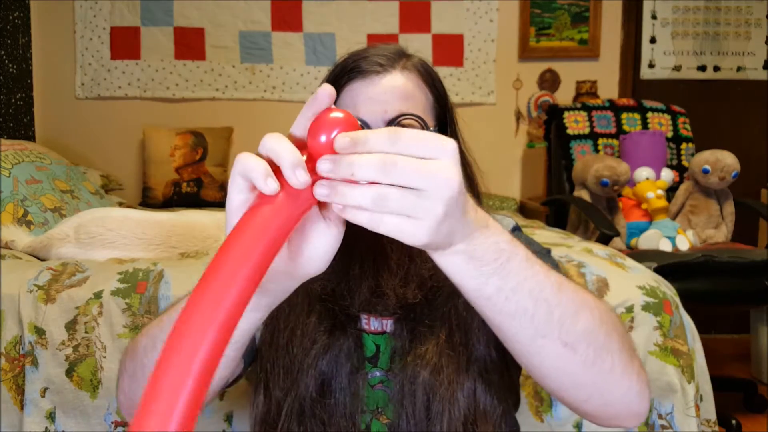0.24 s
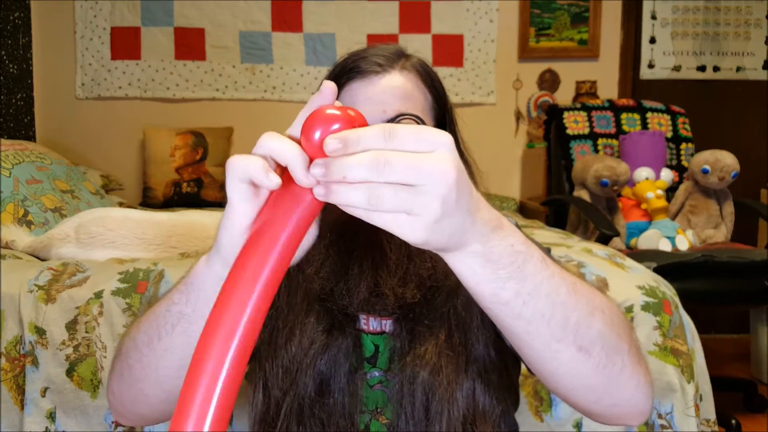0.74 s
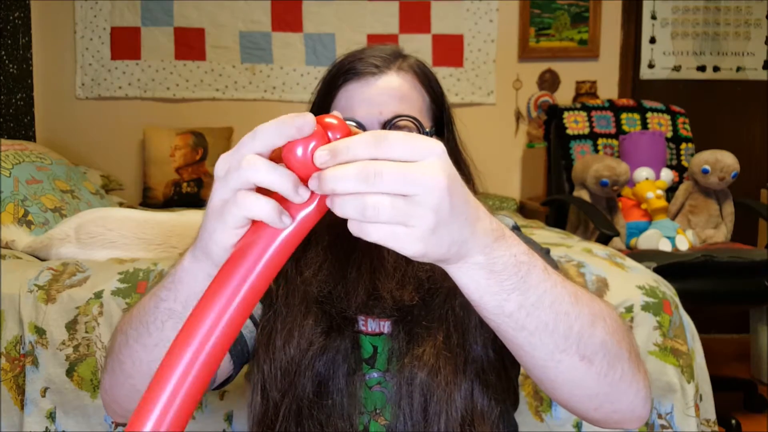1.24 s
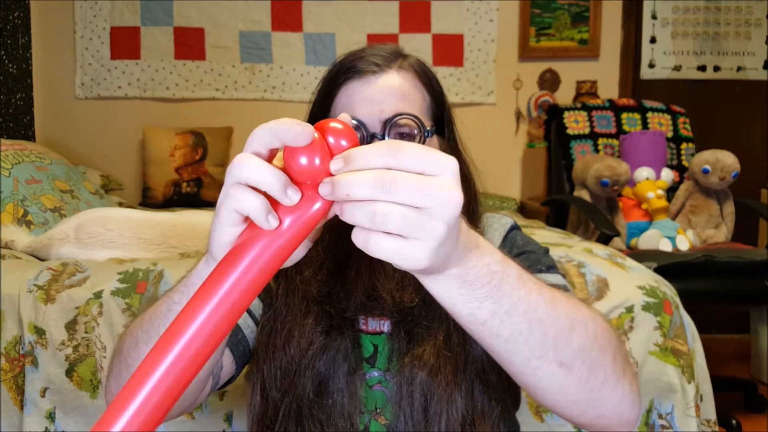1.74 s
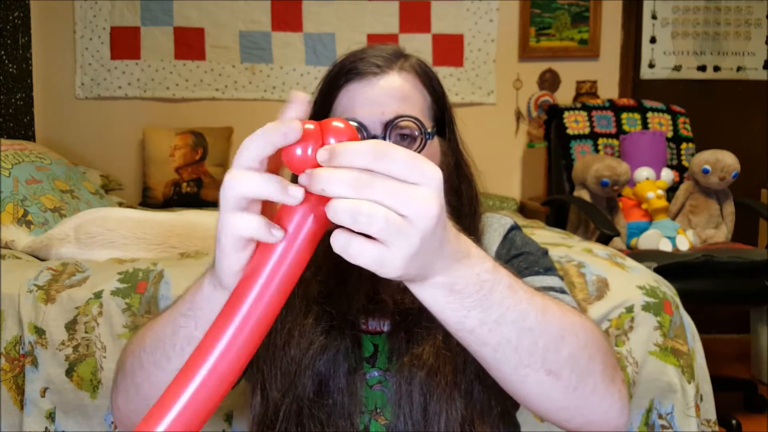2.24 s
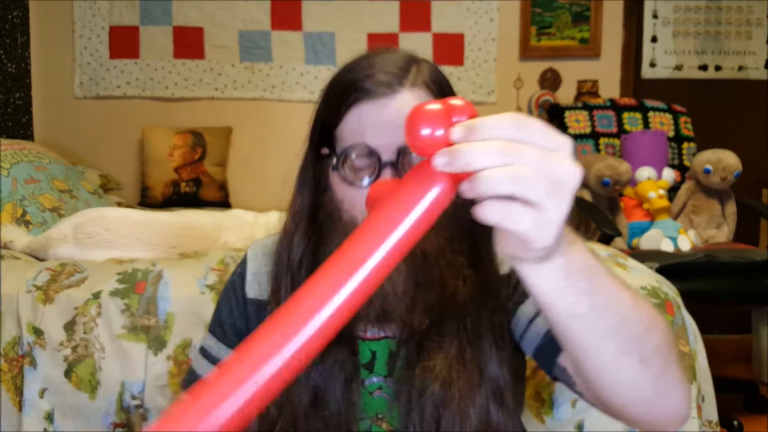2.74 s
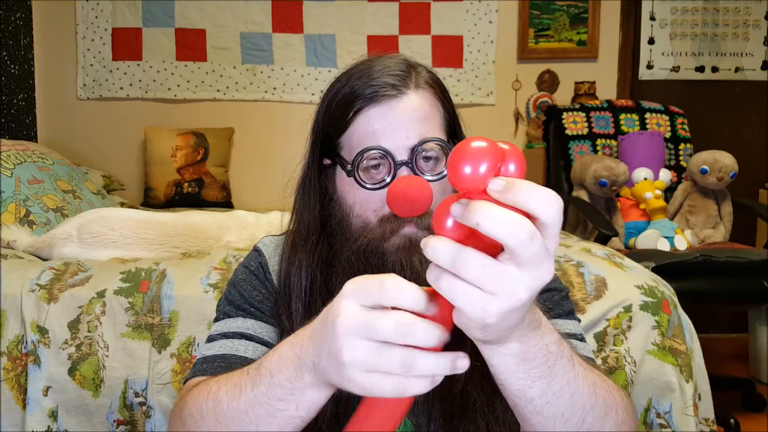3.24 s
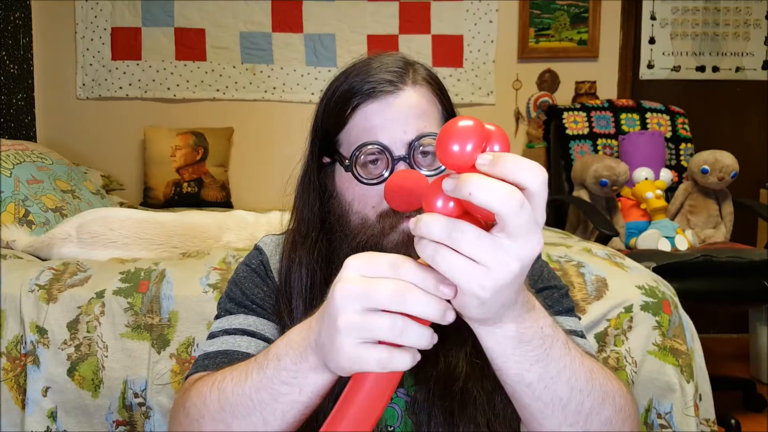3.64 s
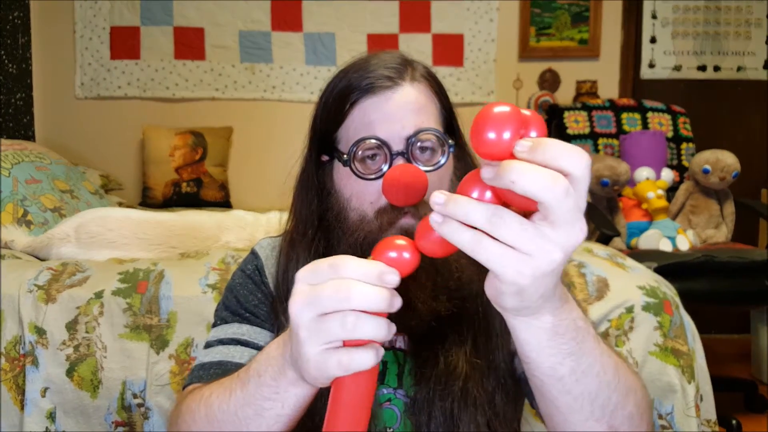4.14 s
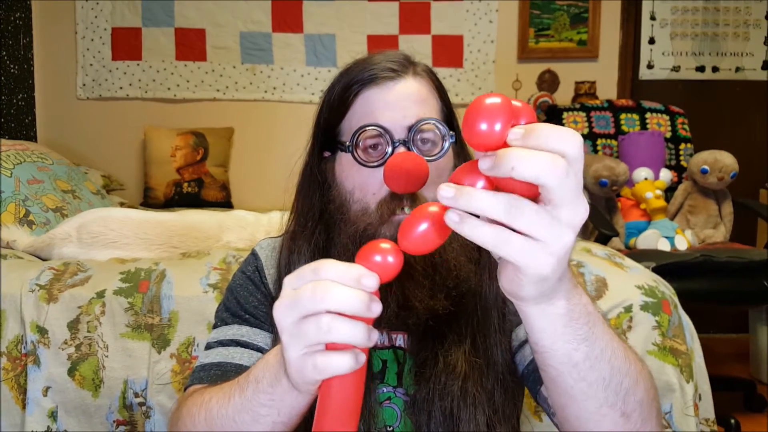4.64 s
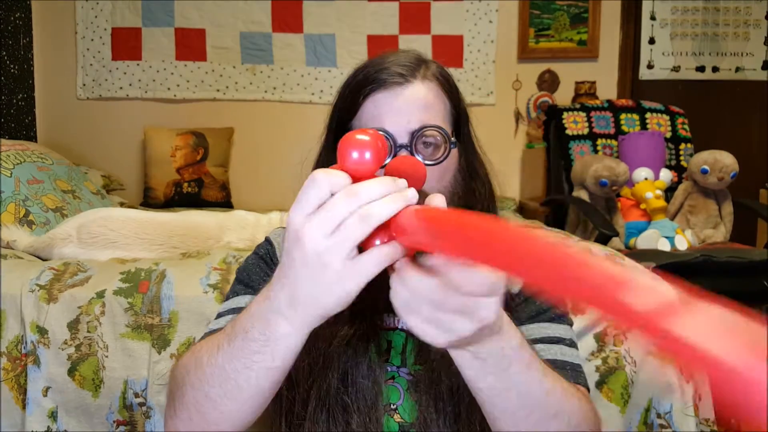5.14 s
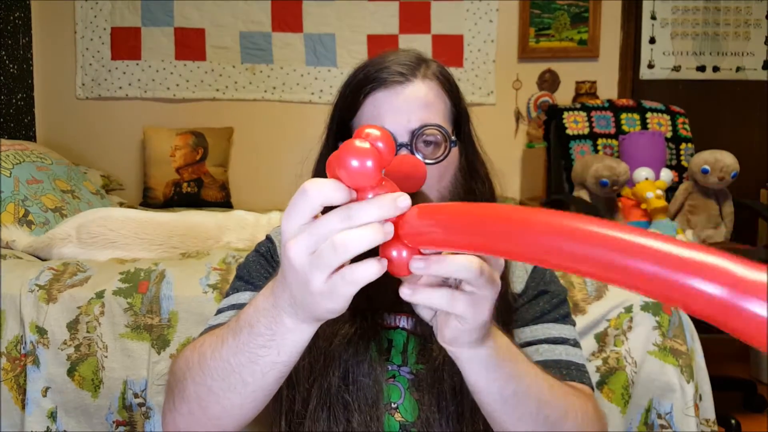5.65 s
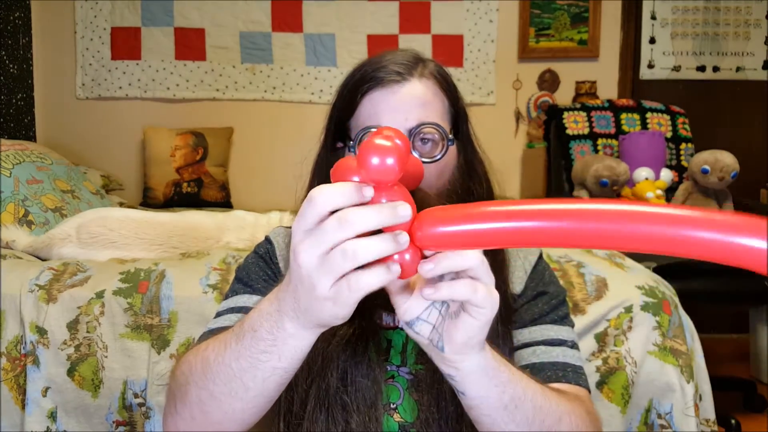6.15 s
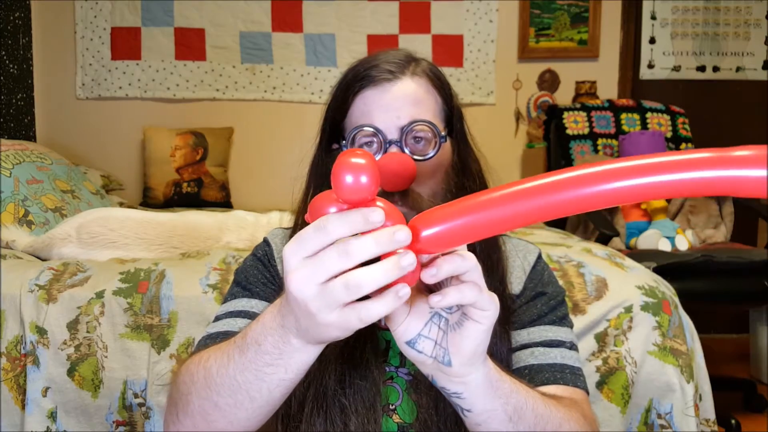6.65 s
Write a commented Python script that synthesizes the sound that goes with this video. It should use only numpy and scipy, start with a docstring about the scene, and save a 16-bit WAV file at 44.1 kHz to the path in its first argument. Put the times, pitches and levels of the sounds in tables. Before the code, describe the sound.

Close rubbery creaks and dry crackly scrapes come in uneven bursts, with hollow pops and popping clicks as a balloon is twisted indoors.

```python
"""In a small, soft bedroom, hands twist a long latex balloon close to two microphones.
Stick-slip friction on rubber and skin makes each stroke a creaking run of tiny slips, now and then a squeak;
single big slips make hollow clicks. Every slip rings the taut skin, thumps the air in the pinched bubble
and sheds a bright crackle of noise. Enclosed air rings in sympathy, over a short reverberation and still air."""
import sys
import numpy as np
from scipy import signal
from scipy.fft import rfft, irfft
from scipy.io import wavfile
from scipy.ndimage import uniform_filter1d, map_coordinates

SR = 44100
rng = np.random.default_rng(int(sys.argv[2]) if len(sys.argv) > 2 else 0)


def to_wav(s):
    """Save 16-bit WAV."""
    ch = np.atleast_2d(s).T  # columns
    pcm = np.round(np.clip(ch, -1, 1) * 32767)  # PCM
    wavfile.write(sys.argv[1], SR, pcm.astype(np.int16))


N = 303408
TIME = np.arange(N) / SR   # s

# Source levels in the tables are nominal: trims, air resonance and filters come later.
# still air, spectral shape only: frequency_hz, relative_density_db
AIR_SPECTRUM = [(25, -5), (130, 6.5), (400, -1.5), (3000, -25.5), (16000, -23)]
AIR_RMS_DB = -73
# colour of the reverberation: frequency_hz, relative_db
ROOM_SPECTRUM = [(150, -5), (800, -1)]
ROOM_T60_S = 0.23
# likeness of diffuse sound in the two channels: frequency_hz, correlation (no unit)
CHANNEL_LIKENESS = [(40, 0.52), (220, 0.83), (700, 0.69), (4000, 0.43)]
# position of the balloon, left of the middle and then near it: time_s, left_right_balance_db, left_lead_ms
POSITION = [(2.4, 0.86, 0.095), (2.85, -0.2, -0.026)]
# air modes of the long tube: frequency_hz, gain_db
TUBE_MODES = [(497, -9), (635, -8), (806, -10), (935, -9), (1636, -9)]
# air modes of a small twisted-off bubble: frequency_hz, gain_db
FREE_BUBBLE_MODES = [(727, 6), (1416, -2), (2191, -1)]
FREE_START_S, FREE_END_S = 4.7, 4.95   # the bubble hangs free between the hands
AIR_T60_S = 0.22
# lowest resonance of the bubble in the fingers: time_s, resonance_hz
BUBBLE_RESONANCE = [(0, 450), (2.1, 422.5), (2.3, 291.1), (3.7, 426.3), (4.25, 365.8), (4.4, 200.6),
                    (4.6, 194), (4.75, 290), (4.97, 280), (5.45, 379), (6.74, 429.9)]
# colour of the skin's modes over all grips: frequency_hz, gain_db
SKIN_COLOUR = [(500, -5), (820, 4.5), (1200, -3), (1650, 0.5), (2700, 1.5), (3500, -2), (4500, 4.5)]
# colour of the crackle: frequency_hz, relative_density_db
CRACKLE_SPECTRUM = [(1000, -3.5), (2500, 7), (4000, 1.5), (5500, -2.5), (10500, -5), (16000, -13)]
# squeaks, slips locked to one skin mode: start_s, length_s, level_db, pitch_hz, glide_octaves
SQUEAK_EVENTS = [(0.045, 0.062, -48.5, 929, -0.12), (1.373, 0.032, -52, 2040, .15),
                 (1.652, .016, -46.5, 3150, -.05), (3.032, 0.031, -57.5, 531, .5),
                 (3.055, 0.043, -54, 1443, 0), (5.38, 0.0063, -48.5, 894.4, -0.017),
                 (6.417, 0.03795, -68.5, 3117, .1), (6.523, 0.008, -45, 2620, 0)]
# single big slips, levels over the first 5 ms: start_s, ring_db, ring_hz, crack_db, thump_db
BIG_SLIPS = [(0.7132, -44, 1592, -53.5, -63.5), (0.8195, -50, 1700, -45, -53), (0.839, -37, 1065, -47, -64),
             (0.9319, -40, 1710, -61, -44.5), (1.1002, -40.5, 1538, -47.5, -42),
             (1.6505, -37, 2500, -44.5, -66), (1.7542, -40, 1099, -39, -45),
             (1.8084, -21, 830, -33.5, -36.5), (1.8243, -26, 838, -38.5, -33.5),
             (1.8505, -47, 2900, -39, -63.5), (2.1497, -51, 2936, -35.5, -60),
             (2.2839, -49, 2153, -35, -37.5), (3.499, -31, 1402, -43.5, -39.5),
             (3.5022, -36.5, 1300, -49, -44), (3.67, -38, 1910, -44, -51), (3.681, -34.5, 2101, -44, -48),
             (3.6915, -43, 2300, -53, -65), (3.734, -35.5, 1751, -44, -46.5), (3.746, -38, 2400, -40, -68),
             (3.7578, -40.5, 1794, -56, -55), (3.766, -39.5, 2101, -53, -67),
             (3.8864, -36.5, 2769, -49, -70), (3.9682, -37, 1296, -47, -40),
             (3.9955, -38, 1303, -50.5, -42.5), (4.0278, -36, 1200, -48, -44.5),
             (4.1062, -39, 1190, -43.5, -43.5), (4.1542, -38, 1172, -46.5, -45),
             (4.416, -31.5, 1600, -42.5, -42.5), (4.4433, -41.5, 1356, -63, -42.5),
             (4.557, -36.5, 1290, -50.5, -41), (4.588, -41.5, 1270, -53.5, -47),
             (4.962, -48, 1401, -49, -53), (5.4309, -38, 1000, -47.5, -57), (5.44, -43, 1091, -53, -58),
             (5.4813, -38, 938.3, -51, -58), (5.488, -37, 910, -52, -37.5),
             (5.516, -37.5, 3700, -35.5, -67), (5.5946, -50, 3186, -47, -66.5),
             (5.7642, -41.5, 1746, -47.5, -72), (5.8342, -44, 1906, -53.5, -60),
             (6.011, -40.5, 1695, -45.5, -51), (6.0222, -39, 1958, -48, -56),
             (6.0826, -38, 1723, -40, -37.5), (6.1102, -38.5, 914, -40, -38),
             (6.522, -39.5, 2628, -48, -51), (6.639, -39.5, 2014, -47, -51), (6.72, -40.5, 1700, -54, -44),
             (6.7742, -38, 1570, -66, -37), (6.8061, -37.5, 1656, -55.5, -43.5),
             (6.8755, -43, 2495, -59, -65)]
# runs, a twisted neck giving way notch by notch: start_s, end_s, gap_s, ring_db, ring_hz, crack_db, thump_db
NOTCH_RUNS = [(0.1187, .205, 0.013, -43, 1350, -51.5, -68), (0.224, .28, 0.012, -44, 1730, -53, -68),
              (3.527, 3.61, 0.033, -44, 1700, -53.5, -51), (4.18, 4.266, .0155, -50.5, 1220, -53, -44),
              (4.768, 4.855, 0.016, -43.5, 1430, -49.5, -51.5)]
RUN_JITTER_S, RUN_SPREAD_DB = 0.001004, 1.5   # the notches of a run are not quite even
# light rubbing of the holding hands: time_s, creak_db, crackle_db
HOLDING = [(0, -57, -52), (1.0, -59, -62), (1.15, -56.5, -56.5), (1.72, -55.5, -61), (2.39, -59, -62.5),
           (2.44, -67.5, -73.5), (2.83, -86, -80.5), (2.87, -60.5, -66), (3.3, -54, -60.5),
           (3.82, -55.5, -61.5), (4.22, -62, -61.5), (4.31, -74, -77), (4.94, -80, -88), (5.13, -57.5, -60),
           (5.38, -53, -60.5), (5.7, -55, -62), (6.21, -52, -58.5), (6.26, -63, -68), (6.88, -65, -71)]
HOLD_RING_HZ, HOLD_THUMP_DB = 1410, -4.5   # skin pitch between strokes; thump relative to creak
# pushes of the fingers or turns of a bubble, levels at mid-stroke, swell from start to end:
# start_s, length_s, creak_db, crackle_db, thump_db, swell_db, pitch_hz
FINGER_STROKES = [(0.0, 0.11, -43, -54, -54.5, 1, 1024), (.122, 0.17, -49, -61, -81, 0, 1400),
                  (0.332, 0.018, -42, -58, -70, 0, 1220), (0.387, 0.053, -45.5, -52, -52.5, 0, 1175),
                  (0.511, 0.024, -50, -63, -60, 0, 893), (0.612, 0.14, -48.5, -50.5, -56.5, -2, 1550),
                  (0.761, 0.11, -45, -47.5, -47, 7, 1010), (.895, 0.041, -47, -57, -55, 2, 1140),
                  (1.474, 0.16, -49, -53, -71, 4, 1378), (1.796, 0.23, -48.5, -49.5, -54, -3, 1134),
                  (2.055, 0.12, -46.5, -50, -47.5, -5, 940), (2.202, 0.02, -43, -45, -46.5, -2, 1839),
                  (2.287, 0.093, -58, -55.5, -61, -2, 1960), (2.849, 0.098, -48, -55.5, -49.5, -8, 950),
                  (3.055, 0.049, -48.5, -64, -56, 6, 1188), (3.164, 0.04, -44.5, -56.5, -57, 0.5, 1152),
                  (3.407, 0.0099, -40, -48.5, -47.5, 3, 1500), (3.666, 0.095, -41.5, -51, -62, 1, 1900),
                  (4.399, 0.042, -52, -56.5, -62, 12, 1420), (4.984, 0.051, -45.5, -54.5, -59, 0, 1460),
                  (5.15, 0.066, -47.5, -63, -55, 2.5, 1290), (5.274, .075, -52, -60, -57, 2, 1014),
                  (5.433, 0.028, -45, -70, -51, -5.5, 945.6), (5.573, 0.034, -48, -53.5, -66, 0, 1410),
                  (6.087, 0.074, -44, -64, -59, -2, 1725), (6.622, .025, -53, -63, -66, 4, 2000),
                  (6.708, 0.056, -49, -60, -48.5, -3.5, 1647), (6.853, 0.028, -42.5, -54.5, -72, 7, 1293)]
ATTACK_S, RELEASE_S = .008, .014   # full rise time; decay constant once the push ends
TIGHTEN_OCTAVES_PER_DB = 0.37   # the skin tightens as a stroke swells and slackens as it fades
# slips per second at the usual creak level; the rate grows as creak gain to this exponent
SLIPS_PER_S, USUAL_CREAK_DB, RATE_EXPONENT = 180, -48, .5
CUTOFF_HZ = 16200


def from_db(db):
    """Amplitude ratio: 20 dB is a factor of ten."""
    return 10 ** (np.asarray(db) / 20)


def rms_one(x):
    """Normalization: scale to a root mean square of 1."""
    return x / np.sqrt(np.mean(x ** 2) + 1e-20)


def in_time(rows):
    """Linear interpolation: each column of a curve at every sample."""
    s, *columns = np.transpose(rows)
    return [np.interp(TIME, s, column) for column in columns]


def at_hz(points, hz):
    """Logarithmic frequency: interpolate a spectrum along octaves."""
    point_hz, value = np.transpose(points)
    return np.interp(np.log(hz), np.log(point_hz), value)


def drift(rate):
    """Slow random variation: rms 1, with this many knots per second joined by lines."""
    knots = rng.standard_normal(int(N / SR * rate) + 2)
    return rms_one(np.interp(TIME * rate, np.arange(len(knots)), knots))


def level(x, window):
    """Short-time power: running rms of all channels together, kept above zero."""
    power = np.mean(np.atleast_2d(x) ** 2, axis=0)
    size = max(int(window * SR), 2)
    smooth = uniform_filter1d(uniform_filter1d(power, size), size)
    return np.sqrt(smooth + 1e-3 * power.mean())


def ring(clicks, hz, t60):
    """Damped resonance: a unit click starts a cosine of height about 1 that falls 60 dB in t60 seconds."""
    radius = from_db(-60 / (t60 * SR))
    angle = 2 * np.pi * hz / SR
    return signal.lfilter([.5, 0, -.5], [1, -2 * radius * np.cos(angle), radius ** 2], clicks + 1e-18)


def colour(x, spectrum):
    """Minimum phase: a causal filter derived from the spectrum through its folded cepstrum."""
    size = 2048
    hz = np.maximum(np.fft.rfftfreq(size, 1 / SR), 1)
    cepstrum = irfft(np.log(from_db(at_hz(spectrum, hz))))
    cepstrum[1:size // 2] *= 2
    cepstrum[size // 2 + 1:] = 0
    impulse_response = irfft(np.exp(rfft(cepstrum)))
    return signal.oaconvolve(x, impulse_response[None], axes=1)[:, :x.shape[1]]


def diffuse(count):
    """Interchannel coherence: white stereo noise whose correlation depends on frequency."""
    mid, side = rfft(rng.standard_normal((2, count)))
    hz = np.maximum(np.fft.rfftfreq(count, 1 / SR), 1)
    alike = np.clip(at_hz(CHANNEL_LIKENESS, hz), -1, 1)
    common = np.sqrt((1 + alike) / 2) * mid
    opposed = np.sqrt((1 - alike) / 2) * side * [[1], [-1]]
    return irfft(common + opposed, count)


def still_air():
    """Ambient noise: steady diffuse noise with the spectrum of the quiet room."""
    return from_db(AIR_RMS_DB) * rms_one(colour(diffuse(N), AIR_SPECTRUM))


def bedroom(x, wet_db, gap_s):
    """Reverberation: dense reflections begin after a short gap and die quickly in the bedding."""
    t = TIME[:SR // 2]
    decay = from_db(-60 * t / ROOM_T60_S) * np.clip(t / gap_s - 1, 0, 1)
    response = colour(diffuse(len(t)), ROOM_SPECTRUM) * decay / np.linalg.norm(decay)
    return from_db(wet_db) * signal.fftconvolve(x, response, axes=1)[:, :N]


def place(x):
    """Interchannel level and time difference: the nearer microphone hears the balloon sooner and louder."""
    balance_db, lead_ms = in_time(POSITION)
    samples = np.arange(N) - lead_ms * SR / 1000
    right = map_coordinates(x[1], [samples], order=3)
    return np.array([x[0] * from_db(balance_db / 2), right * from_db(-balance_db / 2)])


def high_pass(x, hz):
    """High-pass: little of the balloon's sound lies below the corner frequency."""
    return signal.sosfilt(signal.butter(2, hz, "high", fs=SR, output="sos"), x)


def radiate(x):
    """Radiation band: the skin's modes speak only in the middle of the range."""
    return signal.sosfilt(signal.butter(3, [490, 4400], "band", fs=SR, output="sos"), x)


def air_modes(x, modes):
    """Sympathetic resonance: enclosed air answers the balloon's sound and rings on."""
    loss = 1 - from_db(-60 / (AIR_T60_S * SR)) ** 2
    return sum(from_db(db) * loss * ring(x, hz, AIR_T60_S) for hz, db in modes)


def tube(x):
    """Cavity resonance: the long tube is driven, except while the fingers work on a small free bubble."""
    free = (TIME > FREE_START_S) & (TIME < FREE_END_S)
    return air_modes(x * ~free, TUBE_MODES) + air_modes(x * free, FREE_BUBBLE_MODES)


def stroke_envelope(start, length, swell_db):
    """Amplitude envelope: quick attack, a hold that swells or fades, and an exponential release."""
    t = TIME - start
    attack = np.clip(t / ATTACK_S + .5, 0, 1)
    hold = from_db(swell_db * (np.clip(t / length, 0, 1) - .5))
    release = np.exp(-np.clip((t - length) / RELEASE_S, 0, 20))
    return attack * hold * release


def squeaks(trim_db, wobble, flutter_db):
    """Mode locking: a rough, wavering tone glides as the rubber stretches or slackens."""
    out = np.zeros(N)
    waver = 1 + wobble * drift(500)
    flutter = rms_one(from_db(flutter_db * drift(400)))
    for start, length, db, hz, glide in SQUEAK_EVENTS:
        pitch_hz = hz * 2 ** (glide * (np.clip((TIME - start) / length, 0, 1) - .5))
        tone = np.sqrt(2) * np.sin(2 * np.pi * np.cumsum(pitch_hz * waver) / SR)
        out += from_db(db + trim_db) * stroke_envelope(start, length, 0) * tone
    return out * flutter


def bursts(energy, decay_s):
    """Impulsive noise: each snap is a very short burst of bright noise whose power decays exponentially."""
    keep = np.exp(-1 / (decay_s * SR))
    envelope = np.sqrt(signal.lfilter([1 - keep], [1, -keep], energy + 1e-18))
    return colour(envelope * diffuse(N), CRACKLE_SPECTRUM)


def slip_tone(hz, t60, snap_db, body_db, body_cycles, stutter, stutter_s, count):
    """Modal excitation: a broad snap and brief stutter ring one main mode and a scatter of other skin modes."""
    t = TIME[:SR // 10]
    fade = np.clip(1 - t / stutter_s, 0, 1)
    drive = stutter * rng.standard_normal(len(t)) * fade / np.sqrt(stutter_s * SR)
    drive[0] = 1
    main, body = ring(drive, hz, t60), 0
    for mode_hz in np.geomspace(640, 3500, count) * np.exp(0.061 * rng.standard_normal(count)):
        mid, side = rng.standard_normal(2)
        alike = np.clip(at_hz(CHANNEL_LIKENESS, mode_hz), 0, 1)
        gain = np.sqrt(1 + alike) * np.sign(mid) + np.sqrt(1 - alike) * side * np.array([[1], [-1]])
        near = 1 / np.sqrt(1 + 2 * np.log2(mode_hz / hz) ** 2)
        mode = ring(drive, mode_hz, body_cycles / mode_hz)
        body = body + gain * near * from_db(at_hz(SKIN_COLOUR, mode_hz)) * mode
    snap = ring(drive, hz, 2.8 / hz)
    return radiate(rms_one(main) + from_db(snap_db) * rms_one(snap) + from_db(body_db) * rms_one(body))


def slip_series():
    """Successive release: lone slips and run notches as times, gains, ring_db, ring_hz, crack_db, thump_db."""
    series = [([s], [1], *sound) for s, *sound in BIG_SLIPS]
    for start, end, gap, *sound in NOTCH_RUNS:
        times = np.arange(start, end, gap)
        late, strong = rng.standard_normal((len(times), 2)).T
        series.append((times + RUN_JITTER_S * late, from_db(RUN_SPREAD_DB * strong), *sound))
    return series


def big_slips(ring_trim_db, crack_trim_db, thump_trim_db, thump_cycles, damping):
    """Sudden stress release: a stuck fold gives a crack, a hollow ring and a round thump; a run shares one ring."""
    out, cracks = np.zeros((2, N)), np.zeros(N)
    bubble_hz, = in_time(BUBBLE_RESONANCE)
    first = int(.005 * SR)   # levels are set over the first 5 ms
    click = signal.unit_impulse(SR // 10)
    usual_db = np.median(np.array(BIG_SLIPS)[:, 1])
    for times, gains, ring_db, hz, crack_db, thump_db in slip_series():
        # wide swings are cleaner, die sooner and stay mostly in the main mode
        loss_db = damping * max(ring_db - usual_db, 0)
        t60 = 14 / hz * from_db(-loss_db)
        tone = slip_tone(hz, t60, snap_db=-3, body_db=2.5 - loss_db, body_cycles=10.45,
                         stutter=2.8 * from_db(-loss_db), stutter_s=0.0045, count=12)
        air_hz = np.interp(times[0], TIME, bubble_hz)
        # two resonances in series round off the onset
        thump = ring(ring(click, air_hz, 2 / air_hz), air_hz, thump_cycles / air_hz)
        slip = from_db(ring_db + ring_trim_db) * tone / tone[:, :first].std()
        slip = slip + from_db(thump_db + thump_trim_db) * thump / thump[:first].std()
        for s, gain in zip(times, gains):
            at = round(s * SR)
            out[:, at:at + len(click)] -= gain * slip[:, :N - at]
            cracks[at] = first * (gain * from_db(crack_db + crack_trim_db)) ** 2
    peel = np.hanning(SR // 400)   # the contact peels open over 2.5 ms
    return out + bursts(np.convolve(cracks, peel / peel.sum(), "same"), decay_s=.001)


def hands():
    """Power addition: strokes over the light hold give three gains; creak power weights the pitch in octaves."""
    creak_db, crackle_db = in_time(HOLDING)
    power = from_db([creak_db, crackle_db, creak_db + HOLD_THUMP_DB]) ** 2
    octaves = power[0] * np.log2(HOLD_RING_HZ)
    for start, length, creak_db, crackle_db, thump_db, swell_db, hz in FINGER_STROKES:
        envelope = stroke_envelope(start, length, swell_db)
        stroke = np.outer(from_db([creak_db, crackle_db, thump_db]), envelope) ** 2
        glide = TIGHTEN_OCTAVES_PER_DB * swell_db * (np.clip((TIME - start) / length, 0, 1) - .5)
        power = power + stroke
        octaves = octaves + stroke[0] * (np.log2(hz) + glide)
    return *np.sqrt(power), 2 ** (octaves / power[0])


def stick_slip(per_s, jitter, spread_db):
    """Stick-slip friction: stress lets go at uneven intervals, and a longer hold favours a bigger slip."""
    holds = np.exp(jitter * rng.standard_normal(N // 10))
    holds /= holds.mean()
    at = np.searchsorted(np.cumsum(per_s) / SR, np.cumsum(holds))
    sizes = np.sqrt(holds) * from_db(spread_db * rng.standard_normal(len(holds)))
    clicks = np.zeros(N)
    clicks[at[at < N]] = sizes[at < N]
    return clicks


def strike(clicks, hz, cycles, scatter):
    """Modal excitation: every slip strikes one mode, with a strength that differs by slip and channel."""
    at = np.flatnonzero(clicks)
    own, side = rng.standard_normal((len(at), 2)).T
    alike = np.clip(at_hz(CHANNEL_LIKENESS, hz), 0, 1)
    width = np.sqrt((1 - alike) / (1 + alike) * (1 + scatter ** 2))
    common = rng.choice([-1, 1]) + scatter * own
    drive = np.zeros((2, N))
    drive[:, at] = clicks[at] * (common + 0.55 * width * side * [[1], [-1]])
    return ring(drive, hz, cycles / hz) * np.sqrt(hz)


def creak(slips, chatter, centre_hz, cycles, snap_cycles, snap_share, focus_octaves, skirt, wander_db, count):
    """Membrane modes: slips jerk all modes in sharp grains; modes ring most near the pitch set by tension."""
    ringing, snaps = 0, 0
    for hz in np.geomspace(560, 4200, count):
        near = np.exp(-.5 * (np.log2(hz / centre_hz) / focus_octaves) ** 2)
        gain = (skirt + near) * from_db(at_hz(SKIN_COLOUR, hz) + wander_db * drift(16))
        ringing = ringing + strike(chatter * gain, hz, cycles, scatter=0.65)
        snaps = snaps + ring(slips * gain * (skirt + near), hz, snap_cycles / hz) * np.sqrt(hz)
    ringing, snaps = radiate(ringing), radiate(snaps)
    out = np.sqrt(1 - snap_share) * rms_one(ringing) + np.sqrt(snap_share) * rms_one(snaps)
    return out / level(out, .028)


def thumps(clicks, bubble_hz, cycles, focus_octaves, skirt, count):
    """Cavity excitation: the slips shake the air in the held bubble, most near its resonance."""
    out = 0
    for hz in np.geomspace(110, 520, count):
        near = np.exp(-.5 * (np.log2(hz / bubble_hz) / focus_octaves) ** 2)
        out = out + strike(clicks * (skirt + near), hz, cycles, scatter=1.95)
    return out / level(out, 0.011)


def crackle(clicks, grains_per_s, spread_db):
    """Adhesive peeling: tiny patches of latex let go all the time; larger slips stand out as bright ticks."""
    sizes = from_db(spread_db * np.minimum(rng.exponential(1, N), 4))
    grains = (rng.random(N) < grains_per_s / SR) * sizes
    ticks = clicks ** 2 / level(clicks ** 2, .08)
    out = bursts((grains / level(grains, .03)) ** 2 + 1.6 * ticks ** 2, decay_s=.0006)
    return out / level(out, .04)


def rubbing(creak_trim_db, crackle_trim_db, thump_trim_db, uneven_db):
    """Common excitation: stick-slip drives skin, bubble and crackle, faster as the rub grows stronger."""
    creak_gain, crackle_gain, thump_gain, centre_hz = hands()
    per_s = SLIPS_PER_S * (creak_gain / from_db(USUAL_CREAK_DB)) ** RATE_EXPONENT
    bubble_hz, = in_time(BUBBLE_RESONANCE)
    clicks = stick_slip(per_s, jitter=.5, spread_db=3.2)
    # between the main slips the rubber slides in a dense chatter of tiny ones
    chatter = clicks + .3 * stick_slip(8 * per_s, jitter=.8, spread_db=3.5)
    skin = creak(clicks, chatter, centre_hz, cycles=22, snap_cycles=7, snap_share=.3,
                 focus_octaves=.4, skirt=.45, wander_db=3.8, count=28)
    air = thumps(chatter, bubble_hz, cycles=8.6, focus_octaves=0.45, skirt=0.26, count=12)
    fizz = crackle(clicks, grains_per_s=980, spread_db=-2.0)
    pressure = from_db(uneven_db * drift(35))   # the fingers move in small jerks
    out = creak_gain * from_db(creak_trim_db) * skin
    out = out + thump_gain * from_db(thump_trim_db) * air
    out = out + crackle_gain * from_db(crackle_trim_db) * fizz
    return pressure * out


def scene():
    """Superposition: the balloon, its reverberation and the still air add."""
    balloon = rubbing(creak_trim_db=0.0, crackle_trim_db=3.0, thump_trim_db=-3.5, uneven_db=1.69)
    balloon = balloon + big_slips(ring_trim_db=2.0, crack_trim_db=5.5, thump_trim_db=-5.5,
                                  thump_cycles=8.6, damping=0.23)
    balloon = balloon + squeaks(trim_db=2.0, wobble=0.075, flutter_db=4.0)
    balloon = place(high_pass(balloon + tube(balloon), hz=74.872))
    air = still_air()
    return balloon + bedroom(balloon, wet_db=-4.5, gap_s=0.00074) + air


def record(dry):
    """Band limitation: an elliptic low-pass cuts the top steeply."""
    return signal.sosfilt(signal.ellip(10, .1, 80, CUTOFF_HZ, fs=SR, output="sos"), dry)


dry = scene()
out = record(dry)
to_wav(out)
```